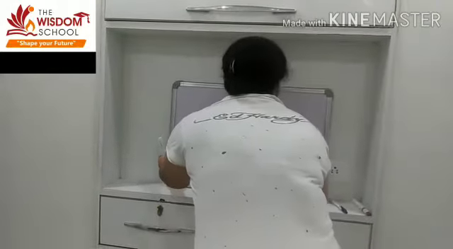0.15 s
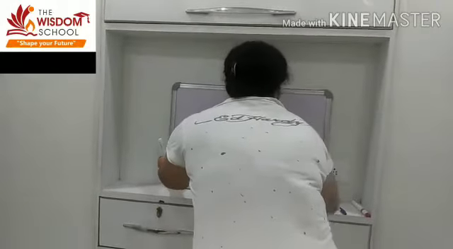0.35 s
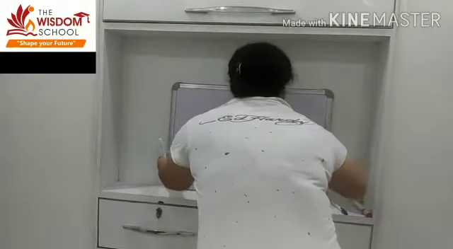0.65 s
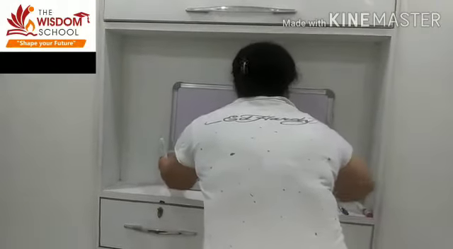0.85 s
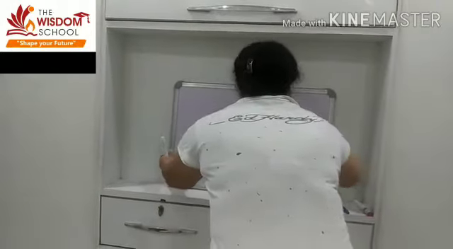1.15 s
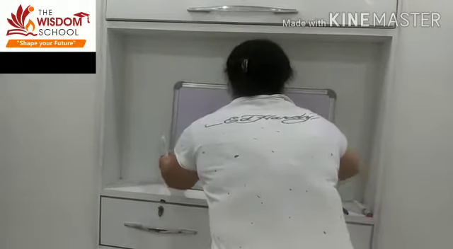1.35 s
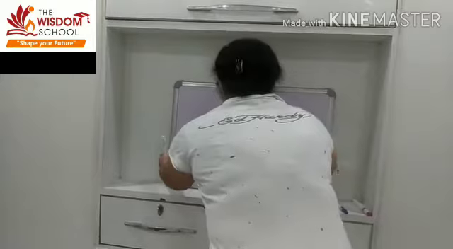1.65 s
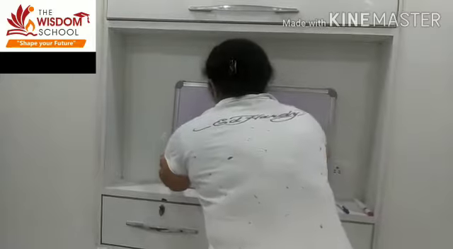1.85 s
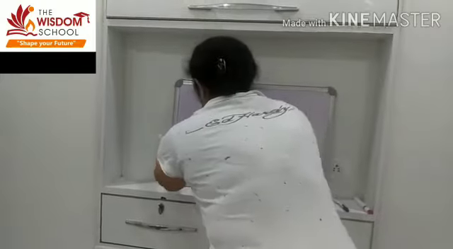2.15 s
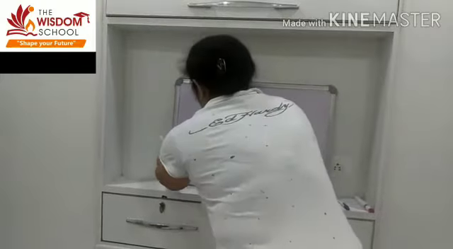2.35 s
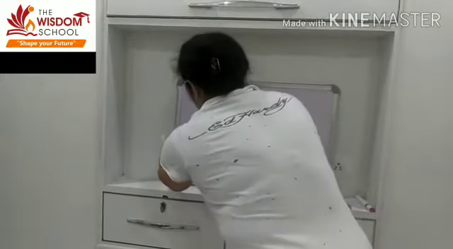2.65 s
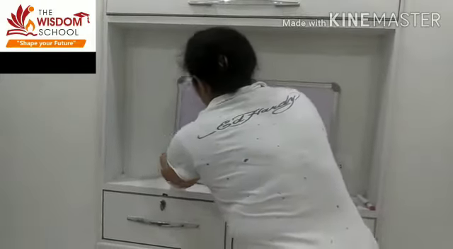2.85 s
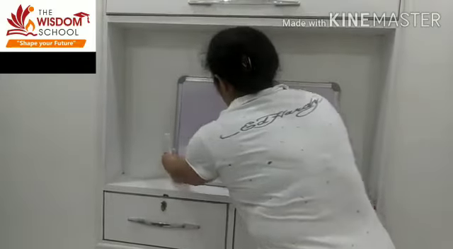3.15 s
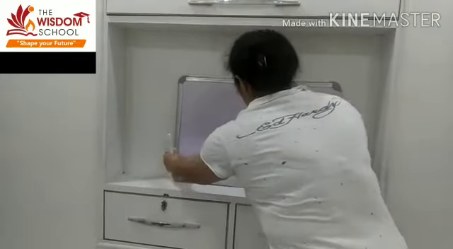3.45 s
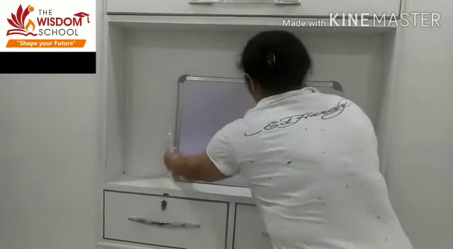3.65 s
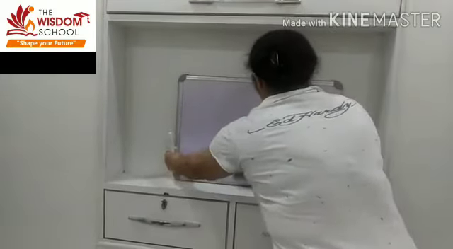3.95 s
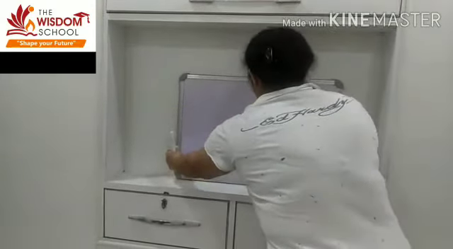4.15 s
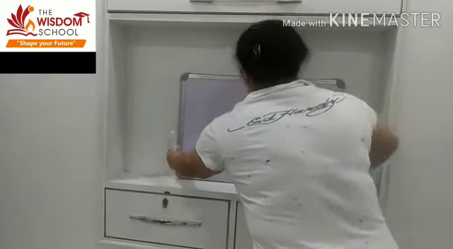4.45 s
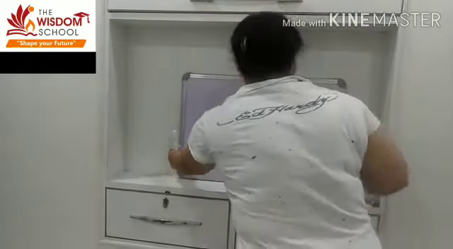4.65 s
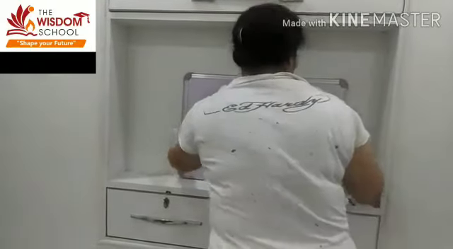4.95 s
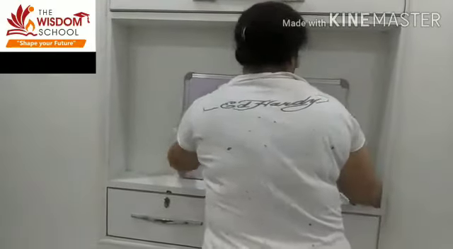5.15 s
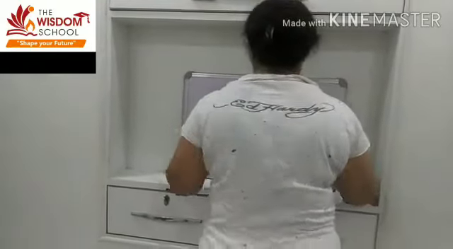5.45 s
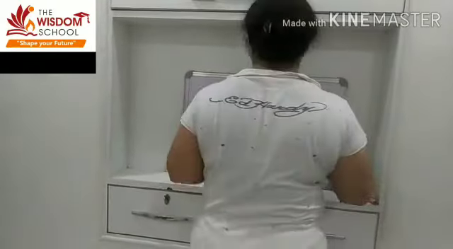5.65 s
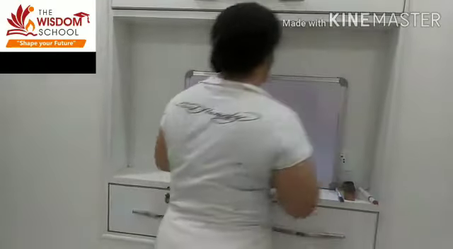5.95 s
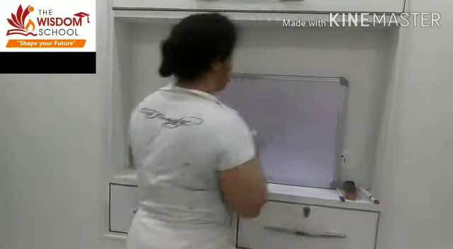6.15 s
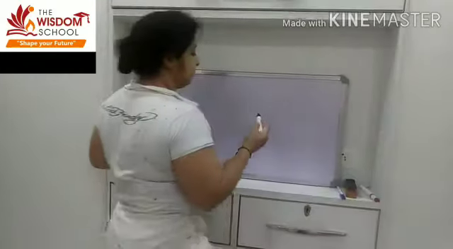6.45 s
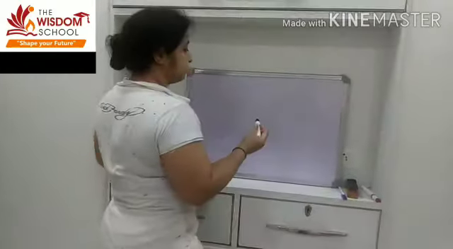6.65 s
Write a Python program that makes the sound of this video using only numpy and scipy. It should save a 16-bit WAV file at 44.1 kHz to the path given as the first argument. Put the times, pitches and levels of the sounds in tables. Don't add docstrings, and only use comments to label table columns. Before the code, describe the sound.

In a bare, lightly echoing room, a stereo phone behind the wiper hears quiet air, faint low hum and rumble. A scuff and small bumps open at 0 s. From about 0.4 to 3.6 s a felt duster sweeps a small whiteboard in soft, uneven hissing scrapes, four or five a second. Hard knocks of the board on its niche strike at 0.63 and 1.06 s, a softer one at 1.44, with short woody booms; small bumps and low rumble come around 3.0 to 3.3. At 3.68 the hollow duster clacks loudly on the shelf, boxy and ringing. A scuff and light bump follow at 4.25, another bump at 4.73. At 5.05 a light landing, a scuff near 5.2, then a cluster of bright clacks from 5.27 to 5.5, strongest at 5.36 and 5.45. From 5.9 to 6.8 hands slide and scuff with faint taps.

```python
import sys
import numpy as np
from scipy import signal
from scipy.fft import rfft, irfft
from scipy.io import wavfile
from scipy.ndimage import uniform_filter1d

SR = 44100
rng = np.random.default_rng(int(sys.argv[2]) if len(sys.argv) > 2 else 0)


def decibels_to_gain(level_db):
    exponent = np.asarray(level_db, float) / 20
    return 10 ** exponent


def wrap_up_sound(samples):
    columns = np.atleast_2d(samples).T
    tamed = np.clip(columns, -1, 1)
    steps = np.round(tamed * 32767).astype(np.int16)
    wavfile.write(sys.argv[1], SR, steps)


N = 298991

# pitch_hz, level_db, t60_s (time to fade by 60 dB)
BOARD_TONES = [(386.9, -2, 0.34), (480, -11.5, 0.15), (612, 5.5, 0.03), (252, -4, 0.066), (125, -3.5, 0.26),
               (185, 8, 0.052), (873, -36.5, 0.079), (1036, -2.5, 0.18), (1230, -9, .08),
               (1900, -15.5, 0.032), (2022, -9, .7)]


def wipe():
    # pitch_hz, level_db (per Hz)
    felt_colour = [(2060, -30), (3500, -9), (4120, -1), (4750, -4), (4900, -2.5), (7910, 0), (14800, -9),
                   (15500, -7)]
    hiss_db, scrape_db, pull_db, rub_db = felt_levels()
    hiss = unit(tint(pair(N), felt_colour)) * decibels_to_gain(hiss_db + 3 + 1.2 * walk(25))
    scrape = unit(band(pair(N), 1820, 3250)) * decibels_to_gain(scrape_db - 2.0 + 1.8 * walk(28))
    flicker_db = 2 * walk(20)
    drag = unit(ring(pair(N), BOARD_TONES[:3])) * decibels_to_gain(pull_db + flicker_db)
    rub = unit(band(pair(N), 460, 1460)) * decibels_to_gain(rub_db + flicker_db)
    return hiss + scrape + drag + rub


def felt_levels():
    # full_speed_s, length_s, hiss_db, grit_db (scrape over hiss)
    strokes = [(0.425, 0.25, -56, -11), (0.625, 0.15, -55, -2), (0.826, .2, -56.5, -2),
               (1.05, 0.34, -55.5, 0.5), (1.28, 0.22, -57.5, -1.5), (1.478, 0.29, -56.5, 2.5),
               (1.699, 0.24, -54.5, -3), (1.915, 0.23, -56.5, -4), (2.132, 0.23, -54, -3.5),
               (2.364, 0.45, -60.5, -2), (2.595, 0.27, -56.5, -6.5), (2.79, 0.27, -56.5, -4.5),
               (3.093, 0.34, -55, -1.5), (3.302, 0.24, -56.5, 0), (3.63, 0.48, -57, -5)]
    # full_speed_s, rise_s, fall_s, hiss_db, grit_db (over hiss)
    scuffs = [(0.034, 0.038, 0.1, -43, 8), (.08, 0.15, 0.35, -55.5, 6.5), (4.21, 0.27, 0.1, -61, 3),
              (4.264, 0.03, 0.082, -48.5, -7), (4.68, 0.11, 0.072, -65.5, 1), (4.75, 0.15, 0.24, -59.5, 1),
              (4.95, 0.16, 0.11, -61, -5), (5.1, 0.18, 0.11, -57.5, 5), (5.201, 0.089, 0.081, -45, -1.5),
              (5.39, 0.068, 0.08, -45, -15), (5.95, 0.056, .09, -55.5, 2.5),
              (6.016, .008, 0.089, -59.5, 18.5), (6.13, 0.045, 0.11, -48, 2), (6.3, 0.28, 0.21, -51.5, 0),
              (6.43, 0.11, 0.056, -50, -3.5), (6.57, 0.072, 0.1, -63, -5), (6.78, 0.092, .1, -57, 1.5)]
    # middle_s, length_s, level_db
    rubs = [
        (0.43, .15, -63),
        (.97, 0.11, -59),
        (4.207, 0.22, -57),
        (4.674, 0.23, -56),
        (4.95, 0.27, -60.5),
        (5.978, 0.15, -57.5),
        (6.123, 0.23, -54.5),
    ]
    rise_share = 0.41
    s, length, db, grit = np.transpose(strokes)
    rise, fall = length * rise_share, length * (1 - rise_share)
    pull_db = swells(s, rise, fall, db - 5 - 2.5 * (s - 1.5))
    s, rise, fall, db, grit = np.hstack([[s, rise, fall, db, grit], np.transpose(scuffs)])
    hiss_db = swells(s, rise, fall, db)
    scrape_db = swells(s, rise, fall, db + grit)
    at, length, rub_db = np.transpose(rubs)
    return hiss_db, scrape_db, pull_db, swells(at, length / 2, length / 2, rub_db)


def swells(s, rise_s, fall_s, db):
    end_db, roundness = -13.5, 1.66
    t, power = np.arange(0, N, 32) / SR, 1e-12
    for at, up, down, top_db in zip(s, rise_s, fall_s, db):
        away = np.abs(t - at) / np.maximum(np.where(t < at, up, down), .005)
        power = power + decibels_to_gain(top_db + end_db * away ** roundness) ** 2
    return np.interp(np.arange(N) / SR, t, 10 * np.log10(power))


def knocks():
    # start_s, strength_db, weight_db (thud over body), hardness_db (crack over body)
    bumps = [(0.0, -29.5, -18.5, -29), (0.023, -58, 25, -26), (0.077, -34, -7, -26), (0.151, -36, -4, -23),
             (0.226, -40.5, -2, -45), (0.631, -19, -13.5, -11), (0.659, -39.5, 0, -15),
             (0.689, -34.5, -23, -17), (1.06, -17, -12, -10), (1.436, -27, -7.5, -18.5),
             (3.047, -56.5, 17.5, -6), (3.182, -40, -0.5, -38), (3.269, -35, -5.5, -22.5),
             (3.295, -39.5, -2, -25), (4.247, -38, 5.5, -3), (4.727, -32.5, 2, -10.5),
             (5.155, -28.5, -6, -50), (5.19, -42, 15.5, -21), (5.226, -41, -3.5, -6),
             (5.879, -46, 8.5, -7.5), (5.949, -54, -3, 0), (6.007, -47.5, 1, -7), (6.363, -48.5, 4, -3),
             (6.672, -37, 1, -19), (6.72, -37.5, -1, -27), (6.763, -36, -3, -12)]
    # (per Hz, over the level of its band)
    bump_colour = [(65, -22.5), (135, 5), (400, -0.5), (680, -3), (1200, -4.5), (2100, -13), (3100, -3.5),
                   (4500, -6.5), (7500, -10), (15000, -17)]
    # base_db (at hardness 0), slope_db_per_db
    bump_edge = [(1.5, 0.12), (4.3, 1.83), (-2, 0.92)]
    hit = decibels_to_gain(36.5) * blows(bumps, bump_colour, bump_edge, rattle_db=-32.0, contact_s=0.012)
    return decibels_to_gain(2.5) * hit + decibels_to_gain(-50.5) * ring(hit, BOARD_TONES)


def drops():
    # start_s, strength_db, weight_db, hardness_db, hollowness_db (extra clack of a flat landing)
    landings = [(3.665, -41, 14.5, -15.5, -1), (3.678, -5.5, -11.5, -16.5, 5.5),
                (3.686, -32.5, -21, -17.5, 9), (3.702, -31, -15, -18.5, 0), (5.051, -24, -12, -26.5, -9.5),
                (5.269, -33, -11, -15.5, -1.5), (5.319, -30.5, -2, -11.5, 1.5),
                (5.357, -9.5, -27.5, -24, 1.5), (5.379, -20.5, -3.5, -14.5, -18),
                (5.424, -21.5, 0, -1, -9.5), (5.447, -7, -31, -18, 0.5), (5.455, -21, -26, 6, 0.5),
                (5.469, -11.5, -39.5, -22, -11), (5.495, -27.5, -1, -12.5, 5.5)]
    # (per Hz, over the level of its band)
    landing_colour = [(95, -16), (170, 0.5), (380, -7.5), (750, -3.5), (1300, -2.5), (2450, -15),
                      (2750, -5), (4600, -9), (7000, -7.5), (15000, -22.5)]
    # base_db (at hardness 0), slope_db_per_db
    landing_edge = [(14.5, 0.79), (1, 1), (-12, 0.85)]
    # pitch_hz, level_db, t60_s
    duster_tones = [(395, -7.5, 0.33), (313, -6, 0.29), (379.8, -1, 0.096), (491, 0.5, .08),
                    (738.6, -3.5, 0.26), (698, -5.5, 0.1), (843, -1, 0.083), (1201, -12, 0.21),
                    (1275, -13.5, 0.25), (1405, 1, 0.057), (2050, -21, 0.037), (2225, 2.5, 0.044),
                    (3270, -9.5, 0.034)]
    hit = decibels_to_gain(32.0) * blows(landings, landing_colour, landing_edge, rattle_db=-31.5, contact_s=0.0034)
    return decibels_to_gain(1) * hit + decibels_to_gain(-44.5) * ring(hit, duster_tones)


def blows(table, colour, edge, rattle_db, contact_s):
    band_of = [1, 1, 0, 0, 2, 2, 3, 3, 4, 4]
    t = np.arange(8192) / SR
    size = (len(table), len(t))
    grains = rng.standard_normal(size) * decibels_to_gain(2.86 * rng.exponential(size=size))
    grains = (t == 0) + decibels_to_gain(rattle_db) * grains * np.exp(-t / contact_s)
    hz, shape_db = np.transpose(colour)
    out = np.zeros(N + len(t))
    for (s, body_db, weight_db, hard_db, *hollow_db), grain in zip(table, grains):
        edge_db = [base + slope * hard_db for base, slope in edge]
        band_db = np.array([0, weight_db, *edge_db])
        db = body_db + band_db[band_of] + shape_db
        db = db + sum(hollow_db) * np.equal(band_of, 2)
        i = int(max(s, 0) * SR)
        out[i:i + len(t)] += irfft(rfft(grain) * causal(on_hz(np.c_[hz, db], len(t))))
    return out[:N]


def causal(db):
    cep = irfft(db * np.log(10) / 20)
    cep[1:len(cep) // 2] *= 2
    cep[len(cep) // 2 + 1:] = 0
    return np.exp(rfft(cep))


def ring(x, tones):
    out = 0
    for hz, db, t60 in tones:
        pole = np.exp(2j * np.pi * hz / SR - np.log(1000) / (t60 * SR))
        out = out + decibels_to_gain(db) * signal.lfilter([1], [1, -pole], x).imag
    return out


def booms():
    # start_s, pitch_hz, level_db
    panel_booms = [(.63, 128.8, -26.5), (1.06, 141, -30), (1.061, 185, -24.5), (1.437, 129.4, -32.5),
                   (.632, 189, -33), (.635, 590, -31), (3.679, 187, -36.5), (3.68, 313, -29),
                   (3.68, 744, -28.5), (3.68, 850, -31), (5.36, 745, -33), (5.45, 746, -22),
                   (4.25, 191, -46), (4.729, 165, -50), (3.09, 121, -36.5), (3.299, 180, -44.5),
                   (5.187, 158, -31.5), (5.449, 125, -38.5), (5.882, 266.7, -36.5), (6.368, 231, -47),
                   (4.733, 123, -39), (6.678, 171.4, -32), (6.691, 125, -46), (6.72, 182, -43)]
    # pitch_hz, t60_s
    shelf_tones = [(336, 0.54), (712, 0.47), (1265, .4)]
    # start_s, low_db, middle_db, high_db
    shelf_hits = [
        (3.68, -27, -27, -39),
        (5.053, -40.5, -41.5, -49),
        (5.358, -40, -33, -34),
        (5.45, -45, -20.5, -22),
        (5.495, -27.5, -47, -44),
    ]
    rows = [(*boom, .28) for boom in panel_booms]
    for s, *levels_db in shelf_hits:
        for (hz, t60), db in zip(shelf_tones, levels_db):
            rows.append((s, hz, db, t60))
    return single_tones(rows)


def single_tones(rows):
    rise_s = .006
    t, out = np.arange(SR) / SR, np.zeros(N + SR)
    for s, hz, db, t60 in rows:
        shape = (1 - np.exp(-t / rise_s)) * decibels_to_gain(db - 60 * t / t60)
        out[int(s * SR):][:len(t)] += shape * np.sin(2 * np.pi * hz * t)
    return out[:N]


def room(x, direct_db, build_s):
    # pitch_hz, t60_s
    room_fade = [(100, 0.24), (300, 0.4), (1000, 0.39), (3000, 0.39), (8000, 0.4)]
    t = np.arange(SR // 2) / SR
    noise, echoes = rfft(pair(len(t))), 0
    hz, t60 = np.transpose(room_fade)
    for k in range(len(hz)):
        share = on_hz(np.c_[hz, np.arange(len(hz)) == k], len(t))
        echoes = echoes + irfft(noise * share, len(t)) * decibels_to_gain(-60 * t / t60[k])
    early_db = 2 * np.exp(-t / .02)
    echoes = echoes * (1 - np.exp(-t / build_s)) * decibels_to_gain(early_db) * decibels_to_gain(-28.0)
    return decibels_to_gain(direct_db) * x + signal.fftconvolve(x[None], echoes, axes=1)[:, :N]


def air():
    # pitch_hz, level_db
    air_colour = [(47, -22.5), (80, -32.5), (162, -10.5), (287, -15.5), (709, -21), (791, -25), (1050, -21),
                  (2660, -27), (3700, -25), (4510, -29.5), (8360, -28.5), (15500, -32.5)]
    # pitch_hz, level_db, t60_s
    niche_tones = [(133.3, -14, 0.94), (155.4, -5, 0.56), (185, -5, 0.034)]
    hum_db, rumble_db = lean_levels()
    hum = unit(ring(pair(N), niche_tones)) * decibels_to_gain(hum_db)
    rumble = unit(band(pair(N), 4, 29)) * decibels_to_gain(rumble_db)
    return unit(tint(pair(N), air_colour)) * decibels_to_gain(-59 + 1.2 * walk(1.9)) + hum + rumble


def lean_levels():
    # middle_s, length_s, hum_db, rumble_db
    leans = [(0.495, 0.16, -51.5, -67), (0.727, 0.82, -76, -53.5), (1.413, 0.26, -53, -52),
             (1.655, 0.51, -54, -60), (2.12, 0.28, -54, -55), (2.67, 0.46, -52, -65), (3.13, 0.2, -44, -60),
             (3.183, .15, -50, -39.5), (3.35, 0.28, -54, -45), (3.56, 0.88, -67, -54),
             (4.208, 0.284, -54, -57.5), (4.4, .2, -63, -63.5), (4.644, 0.5, -54, -67.5),
             (5.947, 0.24, -51, -52.5), (6.15, 0.27, -47.5, -59), (6.549, 0.35, -55, -59.5)]
    s, length, hum_db, rumble_db = np.transpose(leans)

    def over(db, still_db):
        swell_db = swells(s, length / 2, length / 2, db)
        return 10 * np.log10(decibels_to_gain(swell_db) ** 2 + decibels_to_gain(still_db) ** 2)

    return over(hum_db, -58.5), over(rumble_db, -56.5)


def pair(size):
    # pitch_hz, correlation (0 to 1)
    likeness = [(30, .6), (70, .85), (110, .98), (190, .96), (290, .78), (640, .55), (1300, 0.),
                (15000, 0.)]
    alike = np.clip(on_hz(likeness, size), -1, 1)
    mid, side = rfft(rng.standard_normal((2, size)))
    mid, side = mid * np.sqrt(1 + alike), side * np.sqrt(1 - alike)
    return irfft(np.array([mid + side, mid - side]) / np.sqrt(2), size)


def walk(rate):
    k = int(SR / rate)
    held = np.repeat(rng.standard_normal(N // k + 1), k)
    return 1.3 * uniform_filter1d(uniform_filter1d(held, k), k)[:N]


def on_hz(points, size):
    hz, value = np.transpose(points)
    return np.interp(np.log(np.arange(size // 2 + 1) * SR / size + 1), np.log(hz), value)


def tint(x, points):
    return irfft(rfft(x) * decibels_to_gain(on_hz(points, x.shape[-1])), x.shape[-1])


def band(x, lo_hz, hi_hz, order=2):
    return signal.sosfilt(signal.butter(order, [lo_hz, min(hi_hz, .45 * SR)], "band", fs=SR, output="sos"), x)


def unit(x):
    return x / np.sqrt(np.mean(x ** 2))


def scene():
    board = room(knocks(), direct_db=-17, build_s=0.0044)
    duster = room(drops(), direct_db=-18.5, build_s=0.0029)
    return wipe() + board + duster + booms() + air()


def band_limit(x):
    return signal.sosfilt(signal.butter(12, 15560, fs=SR, output="sos"), x)


def record(dry):
    # pitch_hz, left_minus_right_db
    tilt = [(500, 0.3), (1000, 1.5), (2000, 2.5), (4000, 3.5), (8000, 10), (12000, 5.5)]
    tilt_db = on_hz(tilt, N) / 2
    coloured = irfft(rfft(dry) * decibels_to_gain(np.array([tilt_db, -tilt_db])), N)
    coloured = signal.sosfilt(signal.ellip(8, .2, 60, 15500, fs=SR, output="sos"), coloured)
    return band_limit(coloured)


dry = scene()
out = record(dry)
wrap_up_sound(out)
```